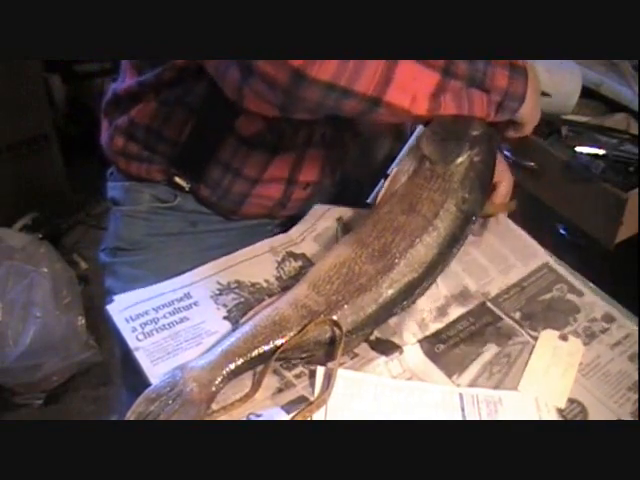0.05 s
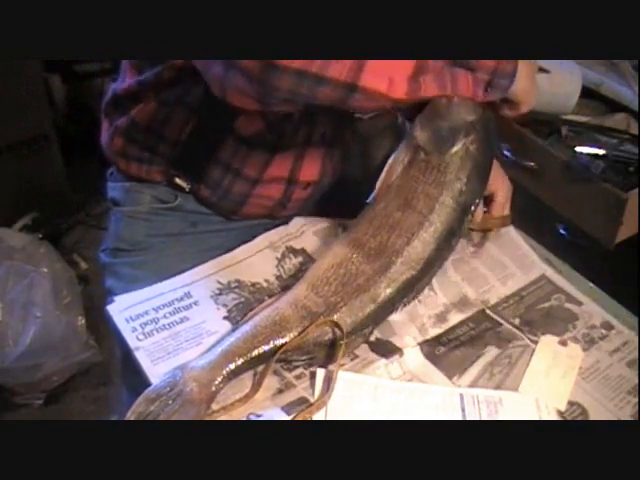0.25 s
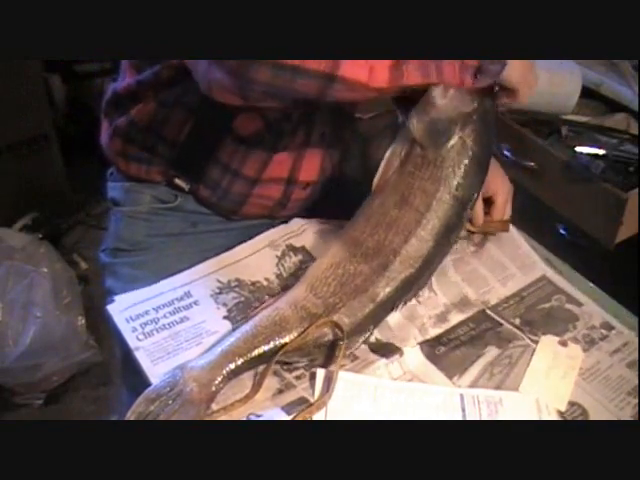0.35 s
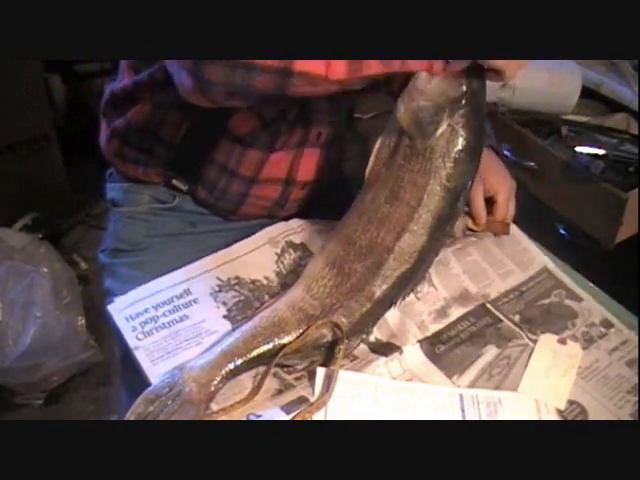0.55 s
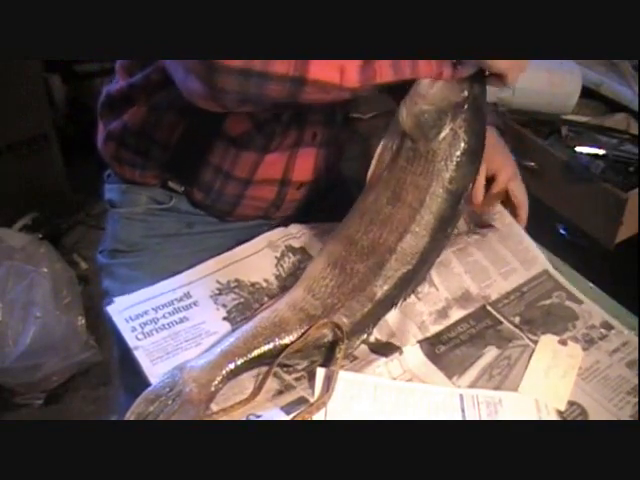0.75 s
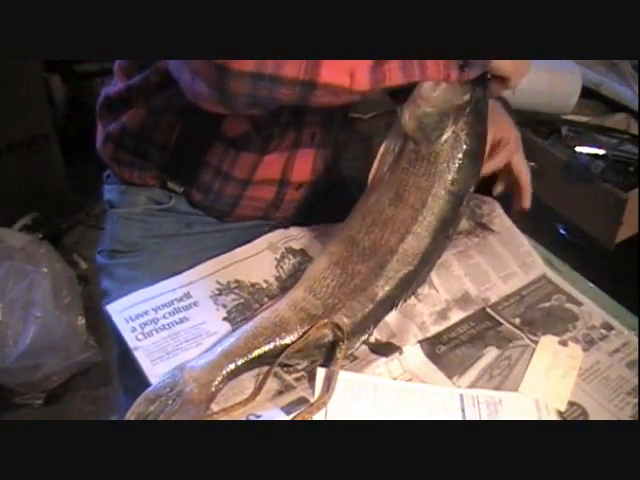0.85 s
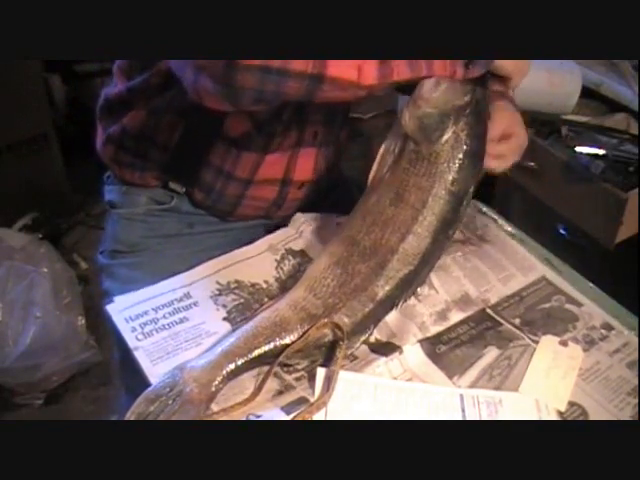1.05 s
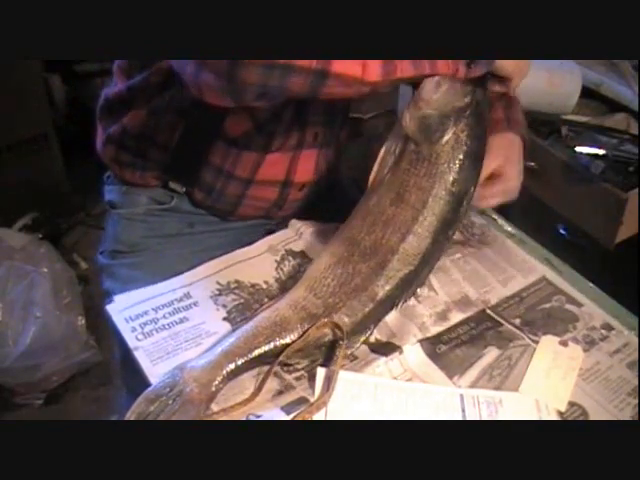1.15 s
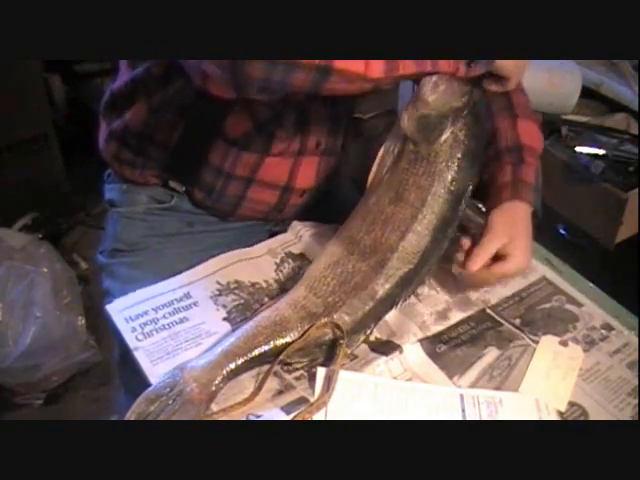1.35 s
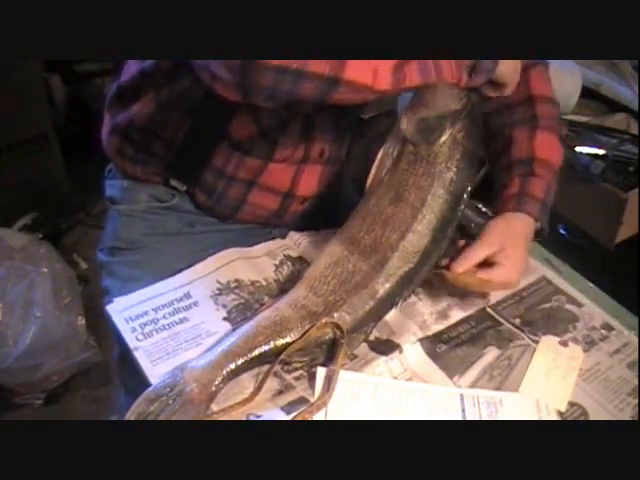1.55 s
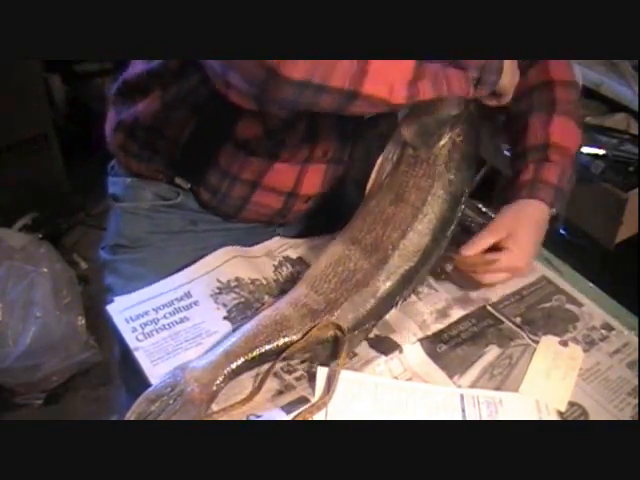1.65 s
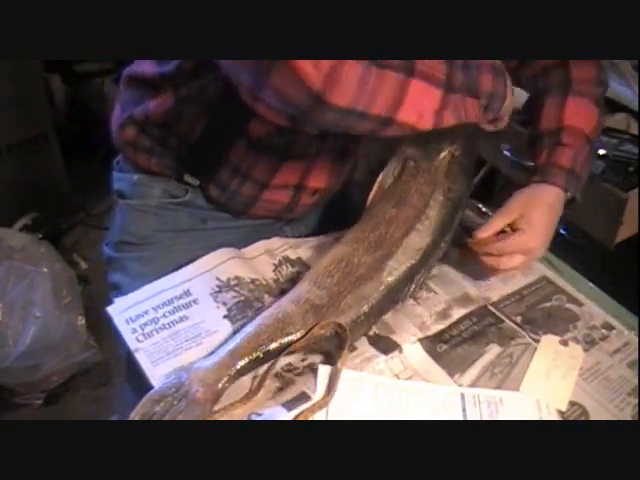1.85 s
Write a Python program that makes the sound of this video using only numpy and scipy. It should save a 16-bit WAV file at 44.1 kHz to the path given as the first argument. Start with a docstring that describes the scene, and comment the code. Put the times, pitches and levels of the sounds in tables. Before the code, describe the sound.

Newspaper rustles and snaps under a large fish, busiest in the first half second with a bright quick crumple, then sparser crinkles and faint dull rubs; close microphone in a small workshop with quiet hiss.

```python
"""A large fish is shifted about on newspaper on a work table, over quiet room hiss.
From the start the paper slides: fine crackle, filtered into a body and a hiss.
Then creases snap one by one: whitened rattles, coloured as thud, flap and crack.
At 0.5 s a fold crumples in a quick bright run of clicks; after 1 s dull resonant rubs join in.
A small workshop rings briefly behind it all: a decaying noise tail."""
import sys
import numpy as np
from scipy import signal
from scipy.fft import rfft, irfft
from scipy.io import wavfile
from scipy.ndimage import uniform_filter1d

SR = 44100
rng = np.random.default_rng(int(sys.argv[2]) if len(sys.argv) > 2 else 0)


def dump_mix(stems):
    """Bounce the given channels to the path in sys.argv[1] as a 16-bit WAV at rate SR."""
    frames = np.atleast_2d(stems).T  # one column per channel
    limited = np.clip(frames, -1, 1)  # hard clip at full scale
    pcm = np.round(limited * 32767).astype(np.int16)
    wavfile.write(sys.argv[1], SR, pcm)


N = 83790

# sliding paper: (time [s], body level before trim [dB], treble level before trim [dB])
SLIDE_LEVELS = [(0, -44.5, -43), (0.06, -48, -49), (0.11, -53, -48.5), (0.17, -53.5, -46.5),
                (0.23, -43.5, -49.5), (0.33, -51, -53), (0.39, -56, -49.5), (0.43, -55, -43.5),
                (0.47, -47, -47), (0.5, -51, -46), (0.58, -52, -53), (0.63, -64, -50), (0.67, -55.5, -54.5),
                (0.72, -60.5, -49), (0.77, -61.5, -53), (0.83, -54, -48), (0.89, -49.5, -45),
                (0.93, -48.5, -38.5), (0.965, -56.5, -44.5), (1.02, -41, -41), (1.07, -57, -55),
                (1.12, -63, -53.5), (1.17, -49, -47.5), (1.22, -49, -53), (1.28, -49.5, -45),
                (1.34, -43.5, -38), (1.39, -47, -41.5), (1.43, -56, -47), (1.49, -55.5, -53.5),
                (1.56, -50.5, -49), (1.61, -53.5, -44), (1.67, -46, -45.5), (1.73, -45, -52.5),
                (1.79, -54.5, -52.5), (1.845, -56, -51), (1.875, -47, -46.5), (1.9, -57, -46)]
# snapping creases: (time [s], thud level before trim [dB], flap level before trim [dB], flap pitch [Hz],
# crack level before trim [dB], crack pitch [Hz], crack tilt [dB/octave], sharp edge [dB], decay [ms])
CREASE_SNAPS = [(0.048, -43.5, -41.5, 1330, -43, 2670, -12, -2, 7.6),
                (0.0982, -51, -43.5, 1240, -40.5, 2860, 0.5, -19, 2.7),
                (0.121, -66, -47, 1150, -39.5, 2620, -9, 12, 3.4),
                (0.1607, -52, -43, 1540, -47, 2780, -18, 2, 1.6),
                (0.167, -47, -44, 1720, -52, 3270, -9, 0, 4.4),
                (0.1812, -61, -35, 1860, -40.5, 6600, 4, -21, 2.2),
                (0.197, -48, -36.5, 1740, -34.5, 2950, 1.5, -6, 2.8),
                (0.215, -43.5, -47, 1710, -49, 3080, -4, 2, 1.87),
                (0.228, -36.5, -30, 1390, -31.5, 6290, 1.5, -5, 0.74),
                (0.2669, -65, -43, 1630, -37, 7040, 9, -1, 1.2),
                (0.2781, -35.5, -25.5, 1760, -27, 6100, 4, 10.5, 1.33),
                (0.3145, -44.5, -39, 1590, -36, 2900, -4.5, -1, 1.96),
                (0.324, -71, -61, 1100, -42, 7130, 9, -3, 3.3),
                (0.3414, -44.5, -38.5, 1760, -42.5, 2610, -16, -6, 3.6),
                (0.3501, -47, -42, 1840, -46, 2610, -8, 1, 2.7),
                (0.4395, -40.5, -36, 1530, -31.5, 4640, -4.5, 10, 6.6),
                (0.4426, -38.5, -33, 1820, -27, 7000, 1, -22, 2.4),
                (0.4459, -39, -36.5, 1060, -46, 6760, -9, -3, 2.1),
                (0.4633, -56, -45, 1640, -38, 4440, -2, -3, 3.1),
                (0.4911, -54, -47, 1720, -42.5, 5300, -5, 3, 2.5),
                (0.502, -46.5, -49, 1520, -33.5, 3140, -2.5, 9, 3.6),
                (0.512, -54, -48, 1300, -35, 5550, -3, 9, 2.3),
                (0.5149, -44, -41, 1090, -22, 8550, 1.5, 6.5, 1.7),
                (0.518, -50, -37.5, 970, -26, 8200, -2.5, 15.5, 1.8),
                (0.52, -41.5, -40, 1200, -30, 5500, 2, -3, 1.5),
                (0.5226, -54, -42, 1850, -25, 5300, -5.5, 7, 2.1),
                (0.5266, -39.5, -34.5, 1800, -23.5, 8500, -3.5, 4, 2.4),
                (0.5295, -50, -37.5, 1780, -24.5, 3800, 5.5, -3, 2.5),
                (0.5398, -46, -55, 1120, -34, 3620, -9, 14, 4.6),
                (0.547, -57, -50, 2180, -27.5, 8300, 12, 3, 1),
                (0.5528, -56, -43.5, 1900, -30.5, 3200, 0.5, 18, 1.5),
                (0.5553, -49, -41, 990, -30, 3200, 2, 3, 1.6),
                (0.5974, -43.5, -35.5, 1600, -35, 6750, -3.5, -1, 3.4),
                (0.616, -60, -58, 1660, -44, 6500, 2, 5, 2),
                (0.6576, -62, -51.5, 1700, -65, 2780, -6, 9, 1.6),
                (0.845, -51, -47.5, 1560, -42.5, 5300, 4, -12, 8.2),
                (0.917, -41.5, -37.5, 1560, -46, 2600, -5, 0, 2.2),
                (0.921, -46, -37, 1580, -35.5, 3240, -8, 17, 3.45),
                (0.933, -48.5, -38, 1530, -43, 6930, 4, -2, 5.5),
                (0.9826, -43, -40.5, 990, -36.5, 3020, -16, 3, 3.8),
                (1.0175, -57, -41, 1570, -47, 3000, -12, -2, 1.1),
                (1.034, -63, -44, 1760, -44.5, 5200, 0, 0, 1.6),
                (1.197, -45.5, -41, 1210, -34, 6800, -2.5, -4, 2.2),
                (1.2011, -42.5, -45, 970, -40, 3120, -9, 11, 2.26),
                (1.235, -50, -48, 1710, -46, 2980, -8, -5, 2.2),
                (1.2458, -39.5, -37, 1380, -43.5, 6780, -1, 0, 0.8),
                (1.275, -63, -46, 1710, -49, 3000, -9, 0, 3.2),
                (1.2922, -44.5, -47, 1010, -53, 7490, 8, 5, 1.8),
                (1.31, -44.5, -38.5, 1270, -42, 2820, -7, 7, 2.7),
                (1.3325, -60, -34, 1550, -36.5, 7350, 7, 4, 3.3),
                (1.368, -54, -43, 1700, -46, 3200, 7, -5, 3),
                (1.3818, -41, -38, 1420, -37, 3800, 0, -10, 6.4),
                (1.3894, -43.5, -41, 1400, -37, 7300, 5, -6, 1.5),
                (1.5032, -48.5, -45, 1150, -47.5, 5640, -6, -16, 2),
                (1.5319, -48, -44, 1700, -25.5, 4400, 6.5, -6, 1.7),
                (1.619, -59, -66, 1770, -43, 7260, 7, 7, 1.3),
                (1.625, -48.5, -42, 1510, -40.5, 3500, -7, 5, 3.6),
                (1.6451, -50, -43.5, 1120, -29, 6240, -4, -1, 1.85),
                (1.666, -46, -41.5, 1570, -43, 4090, -12, -1, 5.2),
                (1.69, -52, -45, 1740, -57, 3340, -2, 0, 2), (1.6935, -65, -58, 1700, -45, 5300, 6, -2, 1),
                (1.7015, -64, -60, 1100, -45.5, 3320, -20, 8, 3.7),
                (1.7118, -53, -42, 1490, -36.5, 4060, -3, -19, 2.26),
                (1.7222, -57, -45, 1300, -46, 3300, -7, -3, 6.7),
                (1.7493, -64, -47, 1500, -48, 4200, -6, -10, 2.1),
                (1.7544, -67, -43.5, 1540, -38, 3830, -5.5, -7, 1.9),
                (1.7923, -66, -54, 1310, -46.5, 2670, -16, 0, 2.1),
                (1.8117, -54, -40.5, 1310, -42.5, 3350, -10, -3, 1.8),
                (1.819, -52, -47.5, 1500, -40.5, 3280, -3.5, -8, 2),
                (1.8219, -51.5, -44, 1160, -48, 3080, -8, -9, 2.8),
                (1.8512, -66, -55, 1500, -53, 3800, -4, -2, 2),
                (1.868, -58, -44, 1820, -40.5, 3430, 0, -7, 3.8),
                (1.8796, -48, -45, 1270, -42, 2820, -6, -8, 2.5)]
# crumpling fold: (time [s], level before trim [dB])
CRUMPLE_LEVELS = [(.5, -46), (.511, -40), (.517, -37), (.524, -48), (.531, -36.5), (.542, -34.5),
                  (.55, -45), (.558, -41), (.575, -68)]
# pitches of the fold's facets: [Hz]
FOLD_FACETS_HZ = (3070, 5270, 7200, 8500, 11300)
# dull rubs: (start [s], length [s], resonance [Hz], width of each filter pass [Hz], level [dB])
RESONANT_RUBS = [(1.032, 0.029, 460, 300, -54), (1.036, 0.099, 860, 300, -54),
                 (1.123, 0.023, 560, 260, -53), (1.293, 0.025, 505, 350, -54.5),
                 (1.503, 0.024, 336, 240, -57), (1.523, 0.029, 326, 80, -55)]

# spectral shapes, scaled to level after filtering: (frequency [Hz], relative density [dB])
BODY_SPECTRUM = [(30, -39), (90, -28.5), (125, -15.5), (190, -9.5), (280, -5.5), (520, 2), (700, 4),
                 (770, 9.5), (850, 0), (980, 5.5), (1250, 4.5), (1450, 5), (1600, 5.5), (2300, 0),
                 (4000, -33)]
HISS_SPECTRUM = [(900, -29), (2200, -2), (3100, 3.5), (4000, -3), (5300, 0), (6800, 3), (8400, -1.5),
                 (10000, -7), (12000, -15), (13500, -21.5), (16000, -30)]
AIR_SPECTRUM = [(25, -2), (60, -13), (90, -0.5), (130, 7.5), (300, 11), (900, 10.5), (2500, 11),
                (7000, -3.5), (11000, -11.5), (16000, -39)]
THUD_SPECTRUM = [(30, -31), (90, -23.5), (130, -19), (200, -10), (310, 3.5), (500, 6), (800, 14.5),
                 (1200, -11), (2500, -35)]
FLAP_SPECTRUM = [(50, -43.5), (300, -29), (750, -8), (1000, -4), (1350, 0), (1800, 0.5), (2200, -5),
                 (3200, -14), (8000, -55.5)]
CRACK_SPECTRUM = [(60, -50), (500, -35), (1600, -11.5), (2300, -4.5), (3100, 4.5), (4200, 2), (6300, 3.5),
                  (8000, 0.5), (9300, -4), (11500, -17), (15500, -30)]
FOLD_SPECTRUM = [(60, -25), (250, -30), (700, 0), (2100, 1), (3100, 6.5), (5300, 1), (7200, 0), (8500, 9.5),
                 (9600, -3), (11700, 2), (13200, -22), (15500, -22)]

# workshop reflections: (frequency [Hz], echo gain [dB])
ECHO_GAIN = [(100, -7), (400, -14.5), (1300, -9.5), (3000, -10), (7000, -7), (14000, -17.5)]
# side gain of echo and air: (frequency [Hz], gain [dB])
DIFFUSE_WIDTH = [(100, -12.5), (380, -8.5), (700, -7.5), (1300, -13), (2400, -15.5), (4400, -15),
                 (8200, -4.5), (15000, 3.5)]
# side of the direct sound against its middle: (frequency [Hz], gain [dB])
PAPER_WIDTH = [(100, -9), (400, -19), (1300, -56), (4000, -16), (6300, -25), (8500, -4), (10000, -8),
               (12000, -17)]

BODY_TRIM_DB, HISS_TRIM_DB, CRUMPLE_TRIM_DB = -2.5, -2.5, 5
THUD_TRIM_DB, FLAP_TRIM_DB, CRACK_TRIM_DB = 0.5, 0, -0.5
AIR_MID_DB, AIR_SIDE_BOOST_DB = -59.5, 11.0  # boost ahead of DIFFUSE_WIDTH
ECHO_T60_S, ECHO_DELAY_S = 0.18, 0.00242
SIDE_PHASE_RAD = 1.67  # direct sound, side against middle
TOP_HZ = 15850

SNAP_LEVEL_S = 0.0046  # each part's energy equals its level held this long
MAIN_CLICK = 0.53  # against a rattle of norm 1
BUILD_SHARE, STOP_POWER = 0.12, 1.16  # build-up per decay time; abruptness of the stop
UNEVEN_DB, UNEVEN_STEP_HZ = 1.2, 550  # random spectral bumps: depth, spacing
EDGE_START_HZ, EDGE_FULL_HZ = 6600, 11300
RUB_RAMP_S = 0.011

FILTER_SIZE = 1024
BINS_HZ = np.maximum(np.fft.rfftfreq(FILTER_SIZE, 1 / SR), 1)


def undb(db):
    """Decibels to gain."""
    return 10 ** (np.asarray(db) / 20)


def unit(x):
    """Scale to rms 1."""
    return x / np.sqrt(np.mean(x ** 2) + 1e-18)


def colour(x, points, extra_db=0):
    """Minimum-phase filter through spectrum points, plus an optional change in dB per bin."""
    hz, db = np.array(points, float).T
    target_db = np.interp(np.log(BINS_HZ), np.log(hz), db) + extra_db
    cepstrum = irfft(np.log(undb(target_db)))
    # fold onto positive time: makes the filter causal
    cepstrum[1:FILTER_SIZE // 2] *= 2
    cepstrum[FILTER_SIZE // 2 + 1:] = 0
    impulse = irfft(np.exp(rfft(cepstrum)))
    return signal.fftconvolve(x, impulse)[:len(x)]


def curve(rows, column):
    """Gain over time from a column of levels, interpolated in dB."""
    rows = np.array(rows, float)
    return undb(np.interp(np.arange(N) / SR, rows[:, 0], rows[:, column]))


def crackle(clicks_per_s, spread_db, friction):
    """Tiny fibre clicks of scattered size and sign over even friction noise."""
    happens = rng.random(N) < clicks_per_s / SR
    size = undb(spread_db * np.minimum(rng.exponential(size=N), 4))
    clicks = unit(happens * size * rng.choice([-1, 1], N))
    return unit(clicks + friction * rng.standard_normal(N))


def sliding():
    """Paper drags under the fish: coarse catches stir the sheet, fine ones merge into a hiss."""
    body = unit(colour(crackle(clicks_per_s=550, spread_db=3.2, friction=0.75), BODY_SPECTRUM))
    hiss = unit(colour(crackle(clicks_per_s=1600, spread_db=3.2, friction=1.3), HISS_SPECTRUM))
    body_part = undb(BODY_TRIM_DB) * body * curve(SLIDE_LEVELS, column=1)
    hiss_part = undb(HISS_TRIM_DB) * hiss * curve(SLIDE_LEVELS, column=2)
    return body_part + hiss_part


def air():
    """Quiet room hiss: steady filtered noise."""
    return undb(AIR_MID_DB) * unit(colour(rng.standard_normal(N), AIR_SPECTRUM))


def echo(x):
    """Dense short workshop reflections: a decaying noise tail, new at each call."""
    t = np.arange(SR // 2) / SR
    decay = np.exp(-np.log(1000) * t / ECHO_T60_S)
    tail = rng.standard_normal(len(t)) * decay * (t > ECHO_DELAY_S)
    tail /= np.linalg.norm(tail)
    return colour(signal.fftconvolve(x, tail)[:N], ECHO_GAIN)


def ring(hz, height_db, half_width_octaves):
    """A resonance of the paper, in dB per bin."""
    return height_db / (1 + (np.log2(BINS_HZ / hz) / half_width_octaves) ** 2)


def rattle(noise, decay_ms):
    """A crease buckles: a rattle builds to a click and stops short, roughly even in spectrum."""
    age = np.arange(FILTER_SIZE) * 1000 / SR / max(decay_ms, 0.2)  # in decay times
    envelope = np.minimum(age / BUILD_SHARE, 1) * np.exp(-age ** STOP_POWER)
    push = noise * envelope
    push /= np.linalg.norm(push)
    push[np.argmax(envelope)] = MAIN_CLICK
    smooth_power = uniform_filter1d(np.abs(rfft(push)) ** 2, size=31)
    uneven_db = 10 * np.log10(smooth_power + 1e-9)
    return colour(push, [(1, 0), (SR, 0)], -uneven_db)


def snaps():
    """Each crease gives way with a bright crack, a sheet flap and a soft thud, coloured its own way."""
    out = np.zeros(N + FILTER_SIZE)
    tilt_octaves = np.log2(np.clip(BINS_HZ, 2800, 8000) / 5500)
    for (at_s, thud_db, flap_db, flap_hz, crack_db, crack_hz,
         tilt_db, edge_db, decay_ms) in CREASE_SNAPS:
        noise, bumps = rng.standard_normal((2, FILTER_SIZE))
        push = rattle(noise, decay_ms)
        uneven = UNEVEN_DB * np.interp(BINS_HZ / UNEVEN_STEP_HZ, np.arange(FILTER_SIZE), bumps)
        flap_ring = ring(flap_hz, height_db=8.1, half_width_octaves=0.14)
        crack_ring = ring(crack_hz, height_db=6.8, half_width_octaves=0.1)
        edge = np.interp(BINS_HZ, (EDGE_START_HZ, EDGE_FULL_HZ), [0, edge_db])
        brightness = crack_ring + tilt_db * tilt_octaves + edge
        thud = unit(colour(push, THUD_SPECTRUM))
        flap = unit(colour(push, FLAP_SPECTRUM, flap_ring + uneven))
        crack = unit(colour(push, CRACK_SPECTRUM, brightness + uneven))
        snap = (undb(thud_db + THUD_TRIM_DB) * thud
                + undb(flap_db + FLAP_TRIM_DB) * flap
                + undb(crack_db + CRACK_TRIM_DB) * crack)
        start = int(at_s * SR)
        out[start:start + FILTER_SIZE] += snap * np.sqrt(SNAP_LEVEL_S * SR / FILTER_SIZE)
    return out[:N]


def crumple():
    """A fold collapses in a run of bright clicks, each facet clicking at its own pitch."""
    t = np.arange(N) / SR
    during = (t > CRUMPLE_LEVELS[0][0]) & (t < CRUMPLE_LEVELS[-1][0])
    effort = curve(CRUMPLE_LEVELS, column=1) * during
    facets = np.zeros(N)
    for hz in FOLD_FACETS_HZ:
        clicks = crackle(clicks_per_s=350, spread_db=2.6, friction=0.1)
        facets += colour(clicks, FOLD_SPECTRUM, ring(hz, height_db=7.5, half_width_octaves=0.23))
    return undb(CRUMPLE_TRIM_DB) * effort * unit(facets)


def rubs():
    """Short drags of skin and paper: fine stick-slip in one resonance swells, holds and fades."""
    out, t = np.zeros(N), np.arange(N) / SR
    grip = crackle(clicks_per_s=3000, spread_db=2, friction=1.5)
    for at_s, length_s, hz, width_hz, level_db in RESONANT_RUBS:
        swell = np.clip(np.minimum(t - at_s, at_s + length_s - t) / RUB_RAMP_S, 0, 1)
        b, a = signal.iirpeak(hz, hz / width_hz, fs=SR)
        resonance = signal.lfilter(b, a, signal.lfilter(b, a, grip))  # two passes
        out += undb(level_db) * swell * unit(resonance)
    return out


def scene():
    """Paper mostly in the middle, its side part phase-turned; separate echoes and air for middle and side."""
    paper = sliding() + snaps() + crumple() + rubs()
    mid = paper + echo(paper) + air()
    hz, db = np.array(PAPER_WIDTH, float).T
    side_gain = undb(np.interp(np.fft.rfftfreq(N, 1 / SR), hz, db))
    paper_side = irfft(rfft(paper) * side_gain * np.exp(1j * SIDE_PHASE_RAD), N)
    diffuse_side = colour(echo(paper) + undb(AIR_SIDE_BOOST_DB) * air(), DIFFUSE_WIDTH)
    side = diffuse_side + paper_side
    return np.array([mid + side, mid - side])


def record(dry):
    """The recorder cuts the top with a steep elliptic low-pass."""
    low_pass = signal.ellip(10, 0.2, 80, TOP_HZ, fs=SR, output="sos")  # order, ripple dB, stop dB
    return signal.sosfilt(low_pass, dry)


dry = scene()
out = record(dry)
dump_mix(out)
```